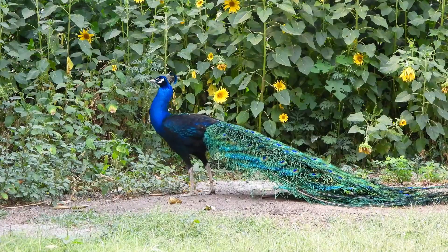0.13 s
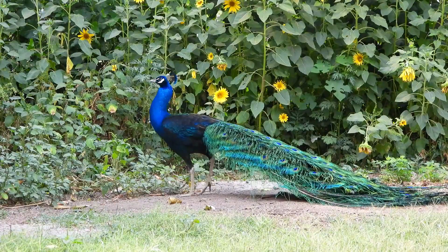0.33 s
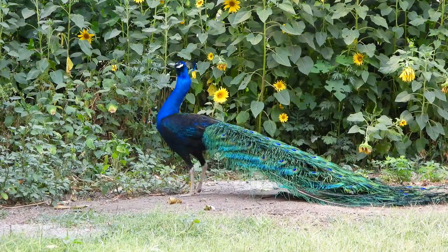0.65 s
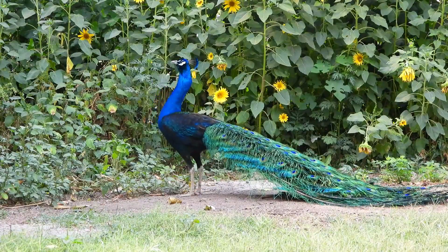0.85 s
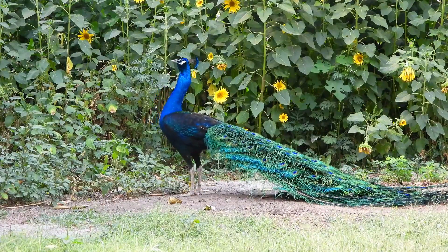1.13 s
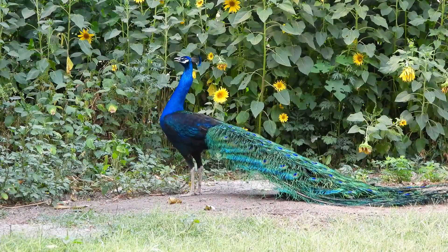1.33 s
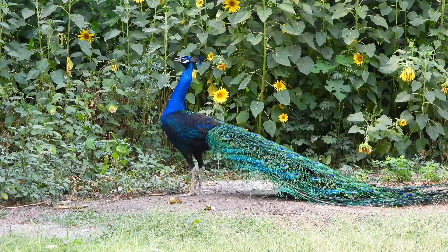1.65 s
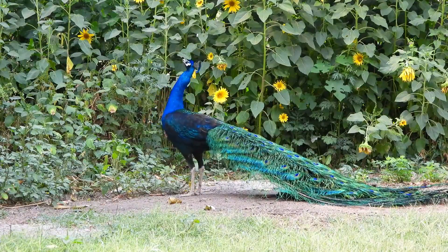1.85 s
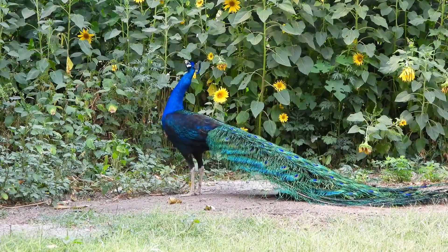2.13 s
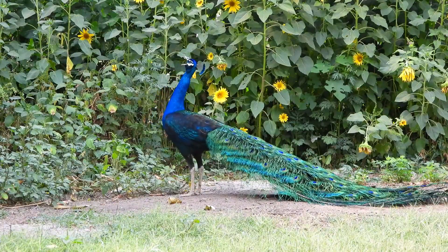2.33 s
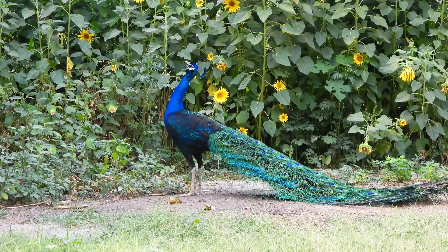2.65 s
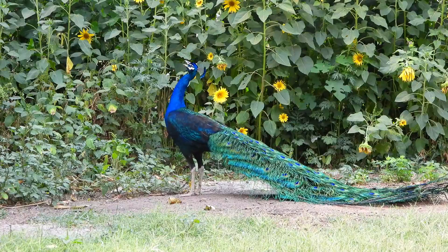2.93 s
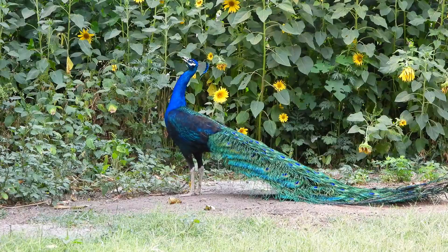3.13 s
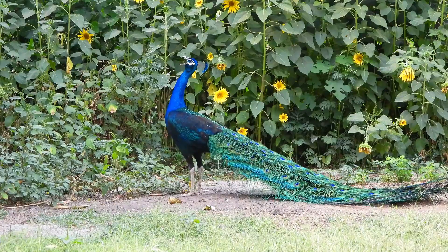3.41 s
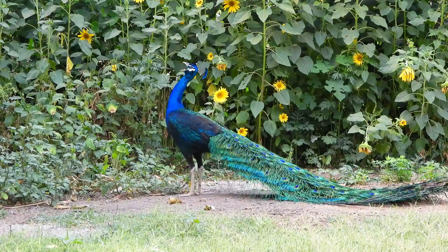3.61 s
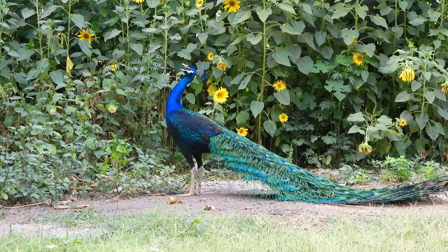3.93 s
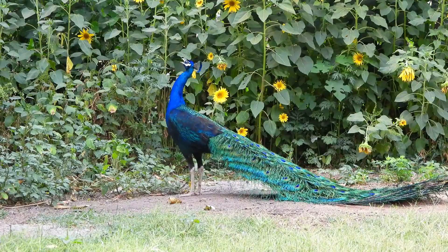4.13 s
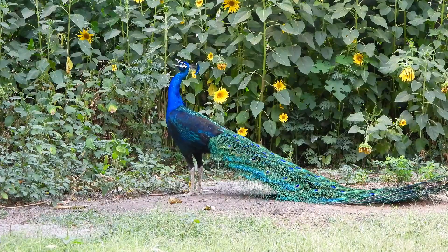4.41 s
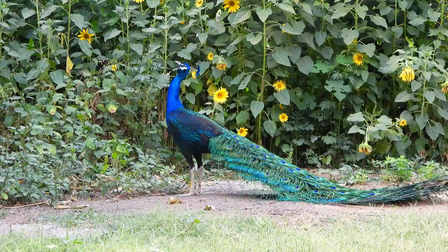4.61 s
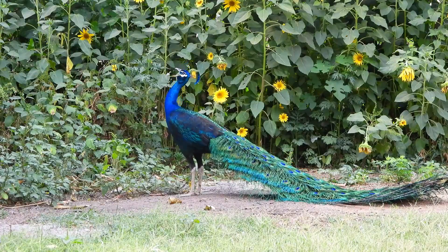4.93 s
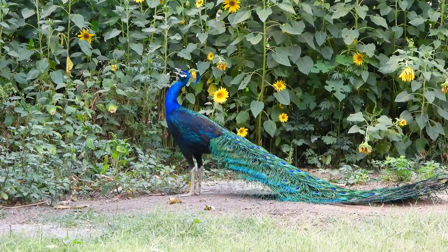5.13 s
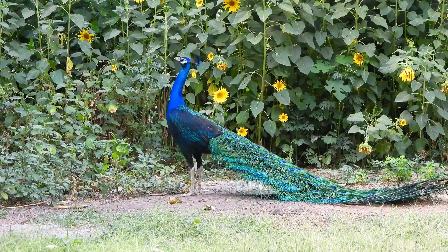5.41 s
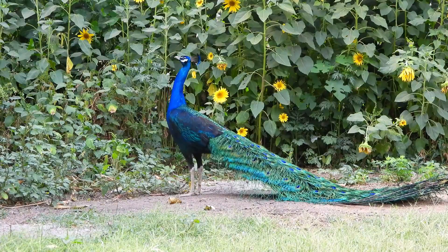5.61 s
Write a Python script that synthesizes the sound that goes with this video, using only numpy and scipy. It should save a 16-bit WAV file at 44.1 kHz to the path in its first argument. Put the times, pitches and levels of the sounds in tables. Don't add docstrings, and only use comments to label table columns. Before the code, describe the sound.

A peacock squawks hoarsely, warbles in a throbbing rattle, then gives three loud, arching cries in a garden with faint birds and a soft hum.

```python
import sys
import numpy as np
from scipy import signal
from scipy.fft import rfft, irfft
from scipy.io import wavfile
from scipy.ndimage import uniform_filter1d

SR = 44100
rng = np.random.default_rng(int(sys.argv[2]) if len(sys.argv) > 2 else 0)


def natural_amplitude(level_db):
    exponent = np.asarray(level_db, float) / 20
    return 10 ** exponent


def generate_wav(sig):
    pcm = np.round(np.clip(np.atleast_2d(sig).T, -1, 1) * 32767).astype(np.int16)
    wavfile.write(sys.argv[1], SR, pcm)


N = 254456


def evened(x):
    return x / np.sqrt(np.mean(abs(x) ** 2) + 1e-20)


def read(points, hz):
    f, value = np.transpose(points)
    return np.interp(np.log(hz + 1), np.log(f + 1), value)


def unroll(rows):
    s, *columns = np.transpose(rows)
    t = np.arange(s[0], s[-1], 1 / SR)
    return t, [np.interp(t, s, c) for c in columns]


def add(mix, t, sound):
    part = mix[..., round(t[0] * SR):][..., :len(t)]
    part += sound[..., :part.shape[-1]]


def wobble(length, width_hz):
    z = rng.standard_normal((length, 2)) @ [1, 1j]
    low_pass = signal.butter(4, np.clip(width_hz, 1, 9000), fs=SR, output="sos")
    return evened(signal.sosfilt(low_pass, z))


def voice(rows, low_throat, throat, top_ratio=1, top_order=30, rough_hz=300, throb=1, low_throb=None,
          glide_rough=0.0079, patchy_db=4, thin_db=1.5, late=None, sway=0, throb_share=((1, 1), (2, 1)),
          rings=(), smears=((1, 1), (2, 1)), lean_hz=0):
    t, (hz, first_db, second_db, third_db, upper_db, rough, tilt_db) = unroll(rows)
    hz = uniform_filter1d(hz, size=1100, mode="nearest")
    glide = abs(np.gradient(hz)) * SR / 1000
    rough = rough + glide_rough * uniform_filter1d(glide, size=2400, origin=700)
    turns = np.cumsum(hz * (1 + sway + 0.0029 * wobble(len(t), 23.2).real)) / SR

    opening = np.maximum.accumulate(np.clip((hz - 680) / 50, 0, 1))
    order = np.arange(4, 24)[:, None]
    colour_db = (1 - opening) * read(low_throat, order * hz) + opening * read(throat, order * hz)
    if late:
        late_colour, late_share = late
        colour_db = colour_db + late_share[:len(t)] * (read(late_colour, order * hz) - colour_db)
    octaves_up = np.log2(np.minimum(order, top_order) / 4)
    upper = natural_amplitude(colour_db + tilt_db * octaves_up) * (order * hz < 15800)
    upper *= natural_amplitude(upper_db) / np.sqrt((upper ** 2).sum(0))
    for (ring_hz, width, db), share in rings:
        bump = np.exp(-((order * hz - ring_hz) / width) ** 2)
        upper = upper * natural_amplitude(db * share[:len(t)] * bump)

    out, shake, drift = 0, wobble(len(t), rough_hz), wobble(len(t), 26.3)
    lean = np.exp(2j * np.pi * lean_hz * t)
    heights = [natural_amplitude(first_db), natural_amplitude(second_db), natural_amplitude(third_db), *upper]
    for k, height in enumerate(heights, 1):
        share = np.clip(rough * k ** 1.02 * read(smears, k), 0, 1)
        smear = np.sqrt(1 - share ** 2) + share * np.roll(shake, 997 * k) * lean
        patch_db = patchy_db * (k > 3) * min(k / 6, 1) * np.roll(drift, 3001 * k).real
        loss_db = thin_db * np.clip(glide - .9, 0, 3) * np.clip(k - 4, 0, 3)
        if k == 1 and low_throb is not None:
            beat = low_throb
        else:
            beat = 1 + read(throb_share, k) * (throb - 1)
        phase = k * turns * (top_ratio if k > 3 else 1) + rng.random()
        tone = (smear * np.exp(2j * np.pi * phase)).real
        out = out + beat * height * natural_amplitude(patch_db - loss_db) * tone
    return t, np.sqrt(2) * out * signal.windows.tukey(len(t), .03)


def cry(rows, null, chest_swell, narrowing, hoarse):
    # [f/Hz, level/dB]
    chest_colour = [(560, -12), (680, -14.5), (750, -9), (810, -11), (1150, -3.5), (1400, -1.5), (1650, 0),
                    (1800, -3), (2250, -11.5), (2450, -8)]
    # [f/Hz, level/dB]
    shut_throat = [(2100, 13), (2540, -3.5), (3200, 0), (3700, 5), (4230, -8.5), (4700, -3.5),
                   (5500, -10.5), (6200, -10), (7800, -14.5), (15000, -52.5)]
    # [f/Hz, level/dB]
    open_throat = [(2100, -3.5), (3050, 0), (3900, -20), (4650, 0), (5400, -15), (6200, -21), (7000, -22),
                   (7800, -17), (8700, -26), (10200, -25), (15000, -46)]
    # [f/Hz, level/dB]
    late_throat = [(2300, -7.5), (3050, 1), (3800, -5.5), (4600, -10), (5400, -7), (6500, -7.5),
                   (7700, -8.5), (8800, -16), (11000, -24), (15000, -50)]
    # [f/Hz, width/Hz, level/dB]
    jump_ring = (2600, 300, 10)
    t, (hz, effort_db, upper_db) = unroll(rows)
    effort_db = effort_db - 17 * np.exp((t[0] - t) / 0.014)
    low = [effort_db + read(chest_colour, k * hz) for k in range(1, 4)]
    low[0] = low[0] + np.interp(t, *np.transpose(chest_swell))

    s, half, depth_db, back_db = null
    dip = np.exp(-(abs(t - s) / np.where(t < s, half, 0.98 * half)) ** 1.76)
    low[2] = low[2] + depth_db * dip + back_db * np.clip((t - s) / 0.16, 0, 1)

    weak = np.clip((-19.5 - effort_db) / 14, 0, 1)
    opening = np.clip((hz - 660) / 60, 0, 1)
    tilt_db = 1.6 * opening - 39.0 * weak
    rough = .003 + 0.091 * weak * (t > s) + hoarse * (1 - opening) * (t < s)
    rows = np.transpose([t, hz, *low, effort_db + upper_db, rough, tilt_db])
    narrow = np.clip(.5 + (t - narrowing[0]) / (2 * narrowing[1]), 0, 1)
    jump = np.exp(-((hz - 705) / 45) ** 2) * (t < s - .2)
    return voice(rows, shut_throat, open_throat, late=(late_throat, narrow), rings=[(jump_ring, jump)])


def cries():
    # [t/s, pitch f/Hz, effort level/dB, upper harmonics against effort/dB]
    curves = [
        [(2.272, 553, -21.5, -12), (2.305, 568, -17.5, -12), (2.345, 598.4, -15.5, -8.5), (2.43, 606, -23, 1.5),
         (2.5, 711.8, -13, -14.5), (2.62, 750.7, -13.5, -16.5), (2.8, 756.7, -15.5, -14), (2.93, 707, -14, -19),
         (3.06, 581.5, -34, 2)],
        [(3.392, 555, -20.5, -16), (3.45, 636.6, -18, -8.5), (3.546, 623, -20, -3.5),
         (3.594, 733.3, -11.5, -14.5), (3.69, 768.4, -13.5, -11.5), (3.81, 780.6, -14, -13),
         (3.91, 765, -10.5, -18.5), (4.0, 722.6, -13.5, -18), (4.1, 607, -33.5, 0.5)],
        [(4.492, 575.5, -21, -16.5), (4.575, 673.6, -17, -7), (4.662, 643.5, -19.5, -2),
         (4.706, 764, -11, -13.5), (4.79, 797, -12, -18.5), (4.92, 811.4, -13, -21),
         (5.04, 797.5, -10.5, -21.5), (5.13, 740.6, -14.5, -18), (5.24, 632, -36, -10)],
    ]
    # [t/s, half length/s, depth/dB, comeback/dB]
    nulls = [
        (2.862, 0.045, -10, 6),
        (3.899, 0.063, -19, 8),
        (4.998, 0.077, -28, 3),
    ]
    # [t/s, level/dB]
    swells = [
        [(2.3, -1.3), (2.5, -1.2), (2.7, -2.1), (2.9, -3.4), (3.05, -0.5)],
        [(3.4, -1), (3.6, -1.6), (3.72, 1.5), (3.86, -0.5), (3.95, -6.5), (4.03, -2)],
        [(4.5, 0.5), (4.66, 0.5), (4.72, -3.5), (4.78, -0.5), (4.87, -7.5), (5.05, -9), (5.17, -5)],
    ]
    # [t/s, half length/s]
    narrowings = [
        (2.84, 0.086),
        (3.818, .08),
        (4.892, 0.043),
    ]
    hoarse_start = (.04, .003, .003)
    for row in zip(curves, nulls, swells, narrowings, hoarse_start):
        yield cry(*row)


def lingers():
    # [t/s, pitch f/Hz, level/dB]
    held = [
        (2.43, 605, -49),
        (3.54, 630, -52),
        (4.656, 652, -38),
    ]
    # [order, level/dB]
    orders = [(5, 0), (6, -2), (7, -7)]
    for s, hz, db in held:
        for order, order_db in orders:
            rows = note(s, .05, slide(order * hz, order * hz), db + order_db)
            yield whistle(rows, flutter=0.33, flutter_hz=60)


def warble(rows):
    # [t/s, throbs so far]
    throbs = [(.765, 0), (.851, 5), (.927, 9), (1.04, 15), (1.16, 21), (1.222, 24), (1.245, 25),
              (1.337, 30), (1.443, 35)]
    # [f/Hz, level/dB]
    warble_throat = [(1350, -41), (2300, -10.5), (3300, -19), (3710, -42), (3990, -15), (4380, -1.5),
                     (4620, -10), (5150, -12), (5600, -17.5), (7660, -23.5), (8360, -36), (13000, -49)]
    # [f/Hz, level/dB]
    loud_throat = [(2300, -6.5), (3300, -11.5), (3800, -30), (4500, -8), (5200, -7), (5900, -14),
                   (7600, -21), (13000, -46)]
    throb_share = [(2, 1), (3, .35), (5, .35), (7, 1), (12, 1)]
    smears = [(1, 2.6), (2, 1), (3, 3), (4, 3), (5, 2.2), (7, .45), (12, .8)]
    depth, turn_s, turn_length_s = .85, 1.07, .05
    t, (hz, effort_db, beak_db) = unroll(rows)
    third_db = effort_db - 18 + 0.6 * beak_db
    upper_db = effort_db + np.minimum(3 + 2.1 * beak_db, -3.5)
    tilt_db = np.clip(9.5 - .85 * beak_db, -7, 6.5)
    rough = .1 - .002 * np.maximum(beak_db, 0)
    rows = np.transpose([t, hz, effort_db, effort_db + beak_db, third_db, upper_db, rough, tilt_db])

    t = unroll(rows)[0]
    done = np.interp(t, *np.transpose(throbs)) + .05 * wobble(len(t), 21).real
    beat = np.cos(2 * np.pi * done)
    uneven = natural_amplitude(1.2 * wobble(len(t), 17).real)
    throb = (1 + depth * beat) * uneven
    opened = np.clip(np.interp(t, rows[:, 0], beak_db) / 4, 0, 1)
    low_throb = (1 + (depth - .45 * opened) * beat) * uneven
    moved = np.clip((t - turn_s) / turn_length_s, 0, 1) * (t[0] < turn_s)
    sway = .025 * np.cos(2 * np.pi * done - 1.1)
    return voice(rows, warble_throat, warble_throat, late=(loud_throat, moved), rough_hz=140, lean_hz=60,
                 thin_db=0, throb_share=throb_share, sway=sway, smears=smears, throb=evened(throb),
                 low_throb=evened(low_throb), top_ratio=0.99, top_order=8, patchy_db=1.5)


def warbles():
    # [t/s, pitch f/Hz, effort level/dB, beak opening/dB]
    curves = [
        [(.75, 607.6, -60, -17), (.77, 612.6, -28, -14.5), (.9, 620.7, -30, -13.5), (1.02, 607.7, -31, -10),
         (1.045, 625, -28, 1), (1.1, 627.6, -28.5, 7), (1.163, 647, -28.5, 19.5), (1.198, 657, -30, 13),
         (1.228, 657.8, -31.5, 11.5), (1.31, 599, -59, -2)],
        [(1.33, 593, -47, -14), (1.347, 576.7, -28.5, -11), (1.375, 605.5, -31.5, 2), (1.405, 603, -33, -3),
         (1.425, 627, -39.5, -4), (1.47, 636, -64, -5)],
    ]
    for rows in curves:
        yield warble(rows)


def squawk():
    # [t/s, pitch f/Hz, effort level/dB]
    curve = [
        (.335, 448, -44),
        (.372, 507, -34.5),
        (.39, 548, -34.5),
        (.42, 562.5, -29.5),
        (.49, 542.6, -27.5),
        (.503, 493.6, -30),
        (.535, 502.5, -34.5),
        (.556, 454, -38),
        (.6, 472, -47),
    ]
    mix_db = (-38, -4.5, -1.5, -1)
    # [f/Hz, level/dB]
    hoarse_throat = [(1150, -39), (1950, -3.5), (2720, -10), (3150, -24), (3450, -14), (5320, -32.5),
                     (7430, -21.5), (12000, -47), (15600, -81), (22000, -120)]
    smears = [(1, 1), (2, 1.1), (3, .7), (4, .7), (5, .5), (6, 1.1)]
    t, (hz, effort_db) = unroll(curve)
    closing_db = 5 * np.sin(np.pi * np.linspace(-.8, 1, len(t)))
    levels = effort_db + np.array(mix_db)[:, None] + closing_db * np.array([[0], [0], [1], [-1]])
    rows = np.transpose([t, hz, *levels, .29 + 0 * t, -6 + 0 * t])
    t = unroll(rows)[0]
    beat = 1 + 0.24 * np.cos(2 * np.pi * (80 * t + 0.45 * wobble(len(t), 15).real))
    return voice(rows, hoarse_throat, hoarse_throat, rough_hz=190, lean_hz=40, thin_db=0, smears=smears,
                 patchy_db=2.5, throb=evened(beat))


def squeaks():
    # [start t/s, length/s, from f/Hz, to f/Hz, level/dB]
    falls = [
        (0.5, 0.04, 1980, 1950, -32),
        (.55, .027, 1780, 1580, -30),
        (.556, .022, 2150, 1850, -35),
        (.578, .014, 1950, 1500, -33),
        (.345, 0.023, 900, 740, -43.5),
    ]
    for s, length, from_hz, to_hz, db in falls:
        yield whistle(note(s, length, slide(from_hz, to_hz), db), flutter=0.28, flutter_hz=90)


def rasp():
    # [start t/s, attack/s, hold/s, release/s]
    shape = (2.272, 0.065, 0.022, 0.32)
    # [f/Hz, level/dB]
    rasp_colour = [(250, -35), (450, -15), (1500, -25), (2300, -8), (2800, -1), (3500, -10.5), (5000, -14),
                   (7000, -57), (15500, -51)]
    t = shape[0] + np.arange(0, sum(shape[1:]), 1 / SR)
    corners = shape[0] + np.cumsum([0, *shape[1:]])
    level_db = -18.5 + np.interp(t, corners, [-18.5, 0, 0, -18.5])
    turns = np.cumsum(167.3 * (1 + .12 * wobble(len(t), 68).real)) / SR
    puffs = (.4 + np.exp(-(turns % 1) / .4)) * rng.standard_normal(len(t))
    colour = natural_amplitude(read(rasp_colour, np.fft.rfftfreq(len(t), 1 / SR)))
    coloured = irfft(rfft(puffs) * colour, len(t))
    return t, natural_amplitude(level_db) * evened(coloured) * signal.windows.tukey(len(t), .1)


def slide(from_hz, to_hz):
    return lambda u: from_hz + (to_hz - from_hz) * u


def note(start, length, pitch, level_db):
    u = np.linspace(0, 1, num=40)
    edge_db = -2 * np.clip(1 - np.minimum(u, 1 - u) / 0.33, 0, 1)
    return np.transpose([start + u * length, pitch(u), level_db + edge_db])


def whistle(rows, flutter=.3, flutter_hz=50):
    t, (hz, level_db) = unroll(rows)
    tone = np.exp(2j * np.pi * np.cumsum(uniform_filter1d(hz, 90, mode="nearest")) / SR)
    flicker = 1 + flutter * wobble(len(t), flutter_hz)
    return t, np.sqrt(2) * natural_amplitude(level_db) * (tone * flicker).real * signal.windows.tukey(len(t), .1)


def sparrows():
    # [t/s, level/dB, left against right/dB]
    chirps = [
        (0.598, -40.5, 6),
        (1.356, -42, -10),
        (1.879, -37, 0),
        (3.76, -41, -9),
        (5.656, -37.5, 1.5),
    ]
    # [t/s, f/Hz, level/dB]
    strokes = [
        [(-.016, 7250, -15), (.006, 7100, -11), (.012, 7350, -5), (.017, 6400, -3), (.021, 5000, -5)],
        [(.048, 6300, -9), (.056, 7450, -5), (.059, 7300, -7), (.063, 6000, -6)],
        [(.05, 4300, -6), (.059, 6250, -6), (.063, 5050, -2), (.076, 4500, -1), (.084, 4150, -4),
         (.092, 3500, -8)],
        [(.093, 4300, -14), (.103, 6100, -10), (.109, 4900, -6), (.118, 4300, -6), (.127, 3700, -10)],
    ]
    # [t/s, level/dB]
    fence = [
        (0, -1.5),
        (.014, -18),
        (0.033, -24),
    ]
    for s, db, pan_db in chirps:
        for row in strokes:
            t, chirp = whistle(np.add(row, [s, 0, db]), flutter=0.65, flutter_hz=200)
            for late_s, late_db in fence:
                sides_db = late_db + np.array([[pan_db / 2], [-pan_db / 2]])
                yield t + late_s, chirp * natural_amplitude(sides_db)


def far_fowl():
    # [start t/s, length/s, top f/Hz, level/dB]
    calls = [
        (0.55, 0.16, 1045, -43),
        (0.753, 0.38, 1112, -42.5),
        (1.409, 0.16, 1474, -51.5),
        (1.958, 0.2, 1050, -52),
        (2.085, 0.28, 1327, -45),
        (2.143, 0.13, 1116, -44.5),
        (3.096, .27, 1510, -48),
        (4.3, 0.23, 1520, -53.5),
        (5.399, 0.22, 1570, -59),
        (0.0, 0.012, 1730, -44),
    ]
    arches = (0.046, 0.057, 0.11, 0.0068, 0.016, 0.0224, 0.14, 0.0293, 0.0296, .01)
    for (s, length, hz, db), arch in zip(calls, arches):
        rows = note(s, length, lambda u: hz * (1 - arch * (2 * u - 1.1) ** 2), db)
        yield whistle(rows, flutter=0.75, flutter_hz=42.3)


def small_birds():
    # [start t/s, length/s, from f/Hz, to f/Hz, level/dB]
    glides = [(0.042, 0.054, 3530, 2970, -57), (0.305, 0.023, 5530, 4130, -48.5),
              (0.348, 0.014, 4320, 4130, -48), (0.769, 0.19, 3330, 3275, -60),
              (0.82, 0.02, 5070, 6000, -44), (0.835, 0.007, 3100, 5740, -40.5),
              (0.837, 0.041, 6010, 5200, -44.5), (0.87, 0.028, 5220, 6000, -48),
              (0.892, 0.022, 6800, 6270, -51), (1.435, 0.021, 5720, 5260, -41.5),
              (1.446, 0.022, 5300, 5640, -51), (1.342, 0.011, 4640, 4620, -63.5),
              (1.46, 0.034, 5260, 6560, -50), (1.478, 0.115, 3014, 2940, -57),
              (1.787, 0.079, 3100, 2960, -52), (2.057, 0.032, 3610, 3380, -55),
              (2.068, 0.02, 1720, 2120, -47), (2.129, 0.095, 3050, 3026, -54),
              (3.208, 0.044, 4360, 5300, -59.5), (3.254, 0.0373, 5100, 4760, -67),
              (4.245, 0.053, 4185, 4595, -65), (4.404, 0.096, 3800, 3670, -65),
              (5.45, 0.039, 3154, 3580, -54.5), (5.476, 0.14, 3570, 3446, -59),
              (5.532, 0.073, 4200, 5100, -77)]
    for s, length, from_hz, to_hz, db in glides:
        yield whistle(note(s, length, slide(from_hz, to_hz), db), flutter=1.1, flutter_hz=161)


def twigs():
    # [t/s, peak level/dB, f/Hz]
    snaps = [
        (0.313, -42, 5200),
        (0.831, -40, 2700),
        (2.054, -45, 5350),
        (2.052, -49, 7350),
        (2.073, -49, 1900),
        (2.074, -45, 4600),
        (2.085, -43, 2020),
        (2.082, -41, 3480),
        (2.083, -42, 4600),
        (4.368, -38.5, 347),
    ]
    for s, db, hz in snaps:
        t = np.arange(0, .03, 1 / SR)
        band = signal.butter(1, [hz * 0.9, hz * 1.1], "band", fs=SR, output="sos")
        noise = evened(signal.sosfilt(band, rng.standard_normal(len(t))))
        yield s + t, natural_amplitude(db - 60 * t / 0.025) * noise


def arrive(x, lead):
    hz = np.fft.rfftfreq(N, 1 / SR)
    turn = np.exp(1j * np.pi * hz * lead / SR * np.array([[1], [-1]]))
    return irfft(rfft(x) * turn, N)


def microphone_pair(length):
    # [f/Hz, share]
    likeness = [(60, 1), (180, 0.96), (550, 0.83), (1650, 0.56), (4970, 0.11), (15000, 0.19)]
    hz = np.fft.rfftfreq(1024, 1 / SR)
    a, b, c, d = rng.standard_normal((length // 256 + 5, 513, 4)).T
    same = np.clip(read(likeness, hz), -1, 1)[:, None]
    left = a + 1j * b
    right = same * left + np.sqrt(1 - same ** 2) * (c + 1j * d)
    return hz, np.array([left, right])


def garden(x, echo_db, tail_db):
    # [f/Hz, time/s]
    fall_time = [(300, 0.3), (1500, 0.61), (2100, 0.61), (3000, 0.26), (8000, 0.34), (15000, 0.087)]
    # [f/Hz, tail level/dB]
    wetness = [(300, -13), (1500, -17), (2100, -12.5), (3000, -5.5), (7000, -5), (15000, 0.5)]
    # [t/s, level/dB]
    echoes = [
        (.0021, -62),
        (.0074, -33),
        (.013, -16),
        (.024, -23),
        (.041, -17),
    ]
    hz, z = microphone_pair(SR)
    t, t60 = np.arange(z.shape[2]) * 256 / SR, read(fall_time, hz)[:, None]
    tail = signal.istft(z * natural_amplitude(-60 * t / t60) / np.sqrt(t60), nperseg=1024, noverlap=768)[1][:, :SR]
    tail *= np.clip(np.arange(SR) / SR / 0.0065 - .2, 0, 1)
    wet = natural_amplitude(read(wetness, np.fft.rfftfreq(SR, 1 / SR)) + tail_db)
    tail = irfft(rfft(tail / np.linalg.norm(tail[0])) * wet, SR)
    for k, (s, db) in enumerate(echoes):
        tail[[0, 1], round(s * SR) + np.array([k % 2, 1 - k % 2])] += natural_amplitude(db + echo_db)
    return signal.fftconvolve(x[None], tail, axes=1)[:, :N]


def hum():
    # [f/Hz, level/dB per Hz]
    hum_colour = [(15, -59), (33, -13), (44, -4.5), (140, -2), (331, -6), (666, -2), (919, -4.5),
                  (1490, -3.5), (1950, -3.5), (2630, -9.5), (3090, -6.5), (3930, -10), (4500, -7),
                  (10900, -25), (13200, -37), (15500, -92)]
    # [t/s, level/dB]
    hum_swell = [(0, 2.5), (0.798, 5), (1.6, 5), (2.2, 2), (3.3, -0.5), (4.301, 2.3), (5.3, 2.5), (5.6, -1),
                 (5.77, -5)]
    # [t/s, half length/s, level/dB]
    rustles = [
        (1.91, 0.11, 5),
        (3.206, 0.23, 2),
        (4.364, 0.11, -7),
        (5.43, 0.1, -5.5),
        (5.705, 0.054, 4),
    ]
    hz, z = microphone_pair(N)
    t = np.arange(z.shape[2]) * 256 / SR
    patches = rng.standard_normal(z.shape[:0:-1]).T
    patches = evened(uniform_filter1d(uniform_filter1d(patches, 14, 0), 12, 1))
    level_db = np.interp(t, *np.transpose(hum_swell))
    rustle_db = sum(db * np.exp(-((t - s) / half) ** 2) for s, half, db in rustles)
    above_bass = np.clip(hz / 400, 0, 1)[:, None]
    treble = np.clip(hz / 9000, 0, 1)[:, None]
    z *= natural_amplitude(read(hum_colour, hz)[:, None] + above_bass * (2.6 * patches + level_db) + treble * rustle_db)
    return natural_amplitude(-44) * evened(signal.istft(z, nperseg=1024, noverlap=768)[1][:, :N])


def scene():
    near, far, sides = np.zeros(N), np.zeros(N), np.zeros((2, N))
    for source in (cries(), lingers(), [squawk()], squeaks(), warbles(), [rasp()]):
        for sound in source:
            add(near, *sound)
    for source in (far_fowl(), small_birds(), twigs()):
        for sound in source:
            add(far, *sound)
    for sound in sparrows():
        add(sides, *sound)
    close = arrive(near, lead=1.06) + garden(near, echo_db=-4.5, tail_db=3.5)
    distant = natural_amplitude(1.5) * far + sides + garden(far + sides.mean(0), echo_db=9.5, tail_db=5.5)
    return close + distant + hum()


def band_limit(x):
    return signal.sosfilt(signal.butter(12, 15720, fs=SR, output="sos"), x)


def record(dry):
    ceiling, knee = .93, 6
    rounded = dry / (1 + abs(dry / ceiling) ** knee) ** (1 / knee)
    return band_limit(rounded)


dry = scene()
out = record(dry)
generate_wav(out)
```